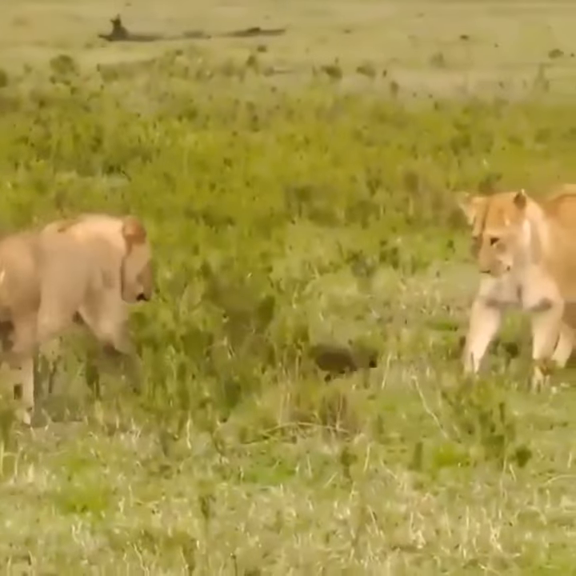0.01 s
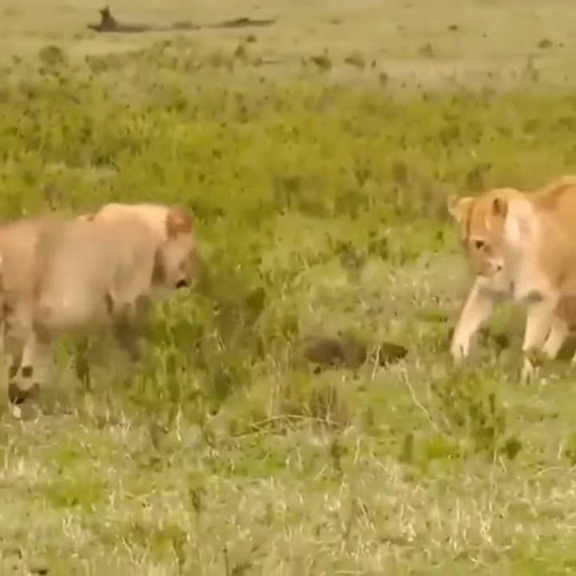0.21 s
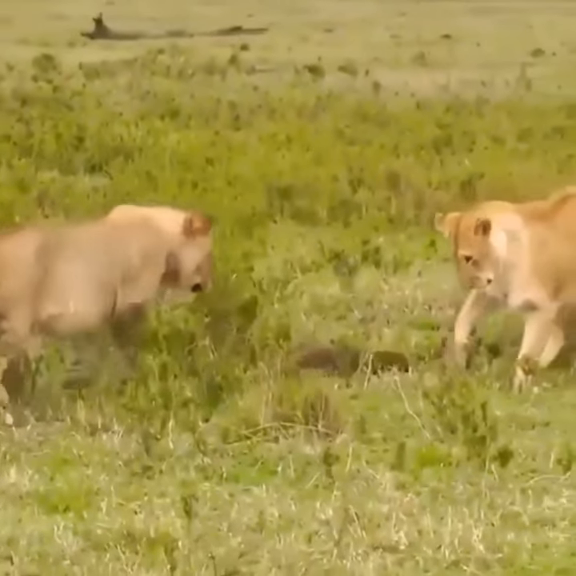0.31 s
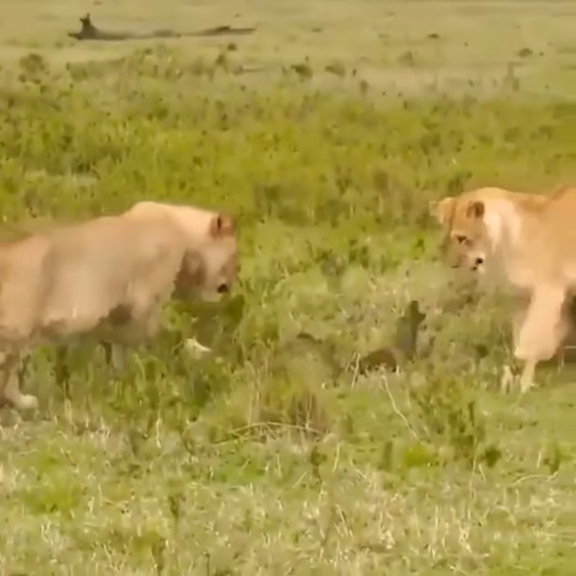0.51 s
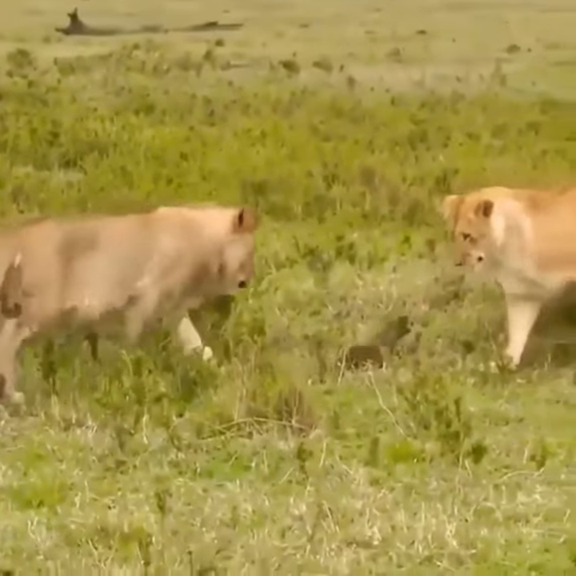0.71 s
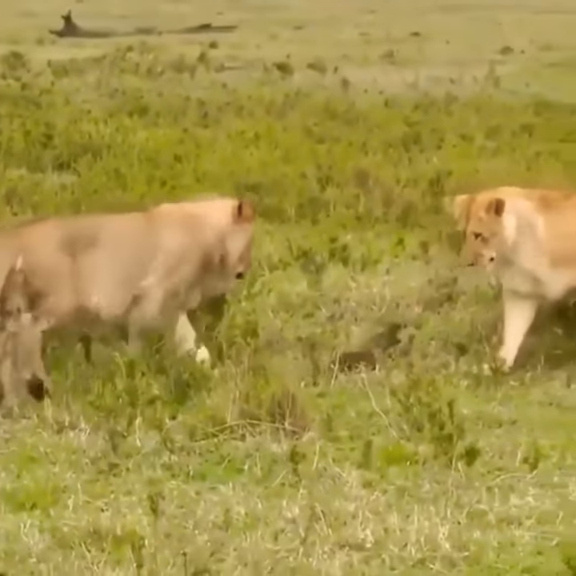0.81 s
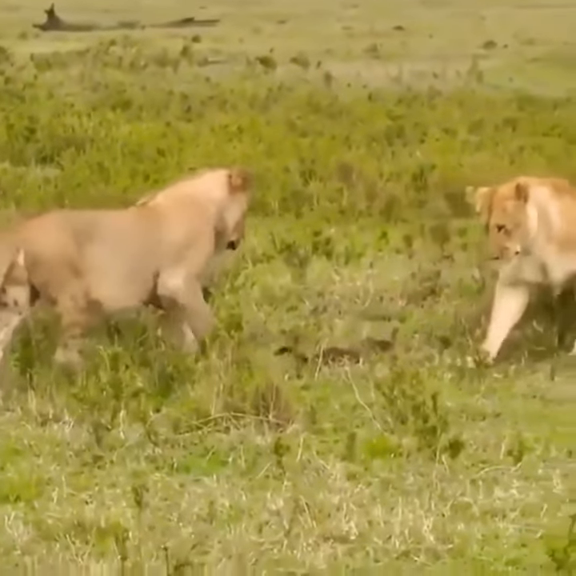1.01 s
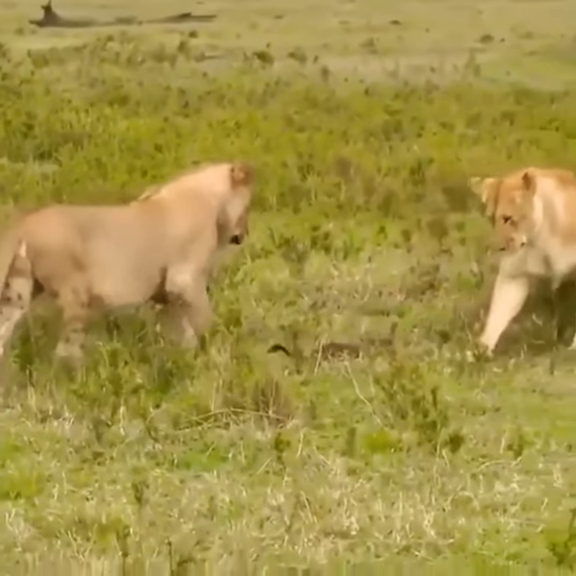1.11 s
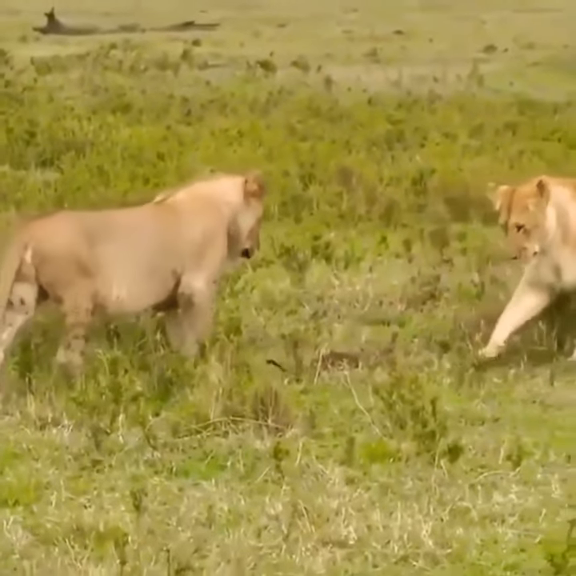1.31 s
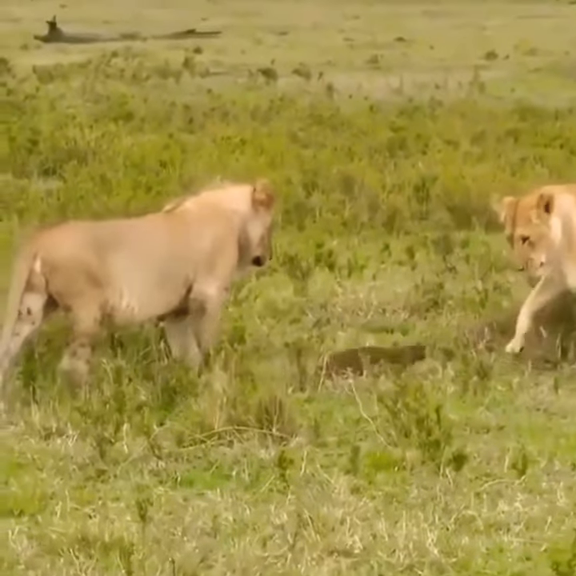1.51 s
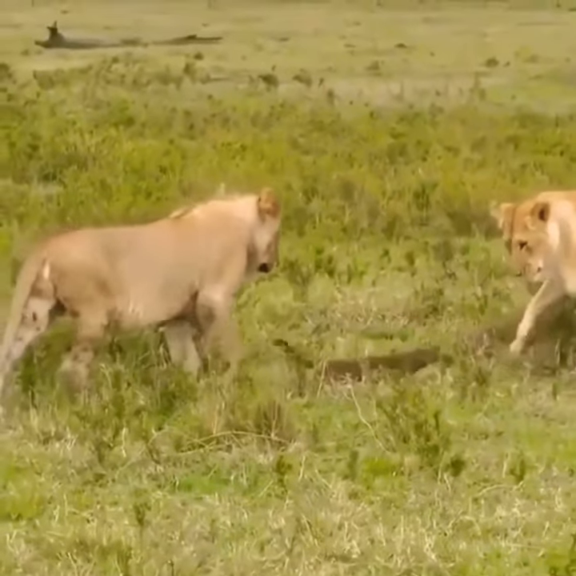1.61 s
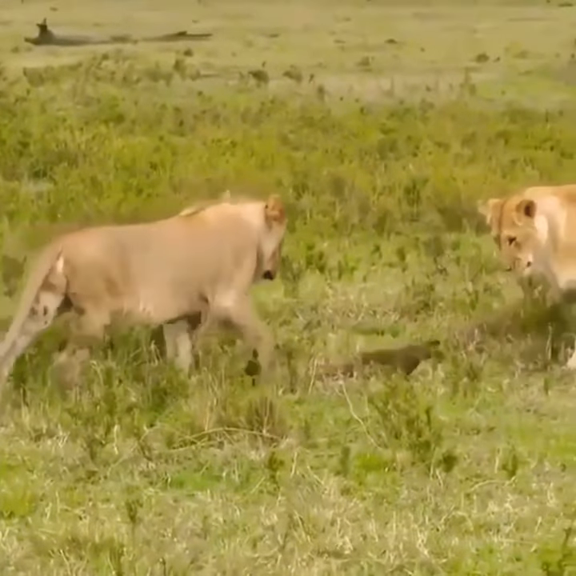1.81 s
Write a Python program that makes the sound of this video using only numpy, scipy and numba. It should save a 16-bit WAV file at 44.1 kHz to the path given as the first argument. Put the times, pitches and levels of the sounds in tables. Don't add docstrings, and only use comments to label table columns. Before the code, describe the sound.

A small wild animal's harsh call, a buzzy whine breaking into a quavering rasp, on windy grassland

```python
import sys
import numpy as np
from scipy import signal
from scipy.fft import rfft, irfft
from scipy.io import wavfile
from scipy.ndimage import uniform_filter1d
from numba import njit

SR = 44100
rng = np.random.default_rng(int(sys.argv[2]) if len(sys.argv) > 2 else 0)


def convert_level_to_amplitude(level_db):
    exponent = np.asarray(level_db, float) / 20
    return 10 ** exponent


def store_wav(level_fs):
    pcm = np.round(np.clip(np.atleast_2d(level_fs), -1, 1) * 32767)
    wavfile.write(sys.argv[1], SR, pcm.T.astype(np.int16))


N = 81585
T = np.arange(N) / SR
LR = np.array([[1], [-1]])


def level(x, db):
    return x * convert_level_to_amplitude(db) / np.sqrt(np.mean(x ** 2))


def smooth_rms(x, size):
    return np.sqrt(uniform_filter1d(x ** 2, size=size))


@njit
def state_variable(x, hz, width):
    y, band, low = np.empty(len(x)), 0., 0.
    for i in range(len(x)):
        g, k = np.tan(np.pi * hz[i] / SR), width / hz[i]
        v = (band + g * (x[i] - low)) / (1 + g * (g + k))
        band, low, y[i] = 2 * v - band, low + 2 * g * v, k * v
    return y


def bandpass(x, hz, width):
    return state_variable(x, hz * np.ones(N), 1. * width)


def ring(x, hz, width):
    return bandpass(bandpass(x, hz, width), hz, width)


def walk(rate):
    hold = int(SR / rate)
    steps = np.repeat(rng.standard_normal(N)[:N // hold + 1], hold)
    return 1.2 * uniform_filter1d(uniform_filter1d(steps, hold), hold)[:N]


def colour(shape):
    hz, db = np.array(shape).T
    f = np.maximum(np.fft.rfftfreq(N, 1 / SR), 1)
    gain = convert_level_to_amplitude(np.interp(np.log(f), np.log(hz), db))
    return level(irfft(rfft(rng.standard_normal(N)) * gain, N), 0)


def tail(x, t60):
    t = np.arange(8192) / SR
    h = rng.standard_normal(len(t)) * convert_level_to_amplitude(-60 * t / t60)
    return signal.fftconvolve(x, h / np.sqrt(np.sum(h ** 2)))[:N]


def fade(start, t60, rise):
    u = np.maximum(T - start, 0)
    return np.minimum(u / rise, 1) * convert_level_to_amplitude(-60 * u / t60)


# (frequency [Hz], level [dB per Hz])
HISS = [(50, 1.5), (130, -12), (300, -12), (800, -14), (1300, -21.5), (2500, -14.5), (5000, -27.5),
        (13000, -46.5)]
# (frequency [Hz], side level [dB])
HISS_SIDE = [(30, -13), (110, -14), (360, -10.5), (800, -14), (1400, -21.5), (3300, -37), (4600, -5),
             (9000, -5.5)]


def field():
    mid, side = rfft(colour(HISS)), rfft(colour(HISS))
    octave = np.log2(np.maximum(np.fft.rfftfreq(N, 1 / SR), 1))
    hz, db = np.array(HISS_SIDE).T
    pair = mid + LR * side * convert_level_to_amplitude(np.interp(octave, np.log2(hz), db))
    hiss, swell = 0, walk(0.63)
    for centre in np.arange(4, 14.5, .5):
        band = np.clip(1 - 2 * np.abs(octave - centre), 0, 1)
        hiss = hiss + convert_level_to_amplitude(swell + 0.56 * walk(12.2)) * irfft(pair * band, N)
    hum = level(ring(rng.standard_normal(N), 46, 25), -56)
    return level(hiss, -45) + hum


# (time [s], level [dB])
GUST = [(0, -67), (.1, -59), (.25, -42), (.4, -40.5), (.48, -37.5), (.6, -44), (.8, -43.5), (.95, -53),
        (1.2, -78), (1.5, -50.5), (1.65, -48.5)]
# (frequency [Hz], level [dB per Hz])
GUST_COLOUR = [(25, -23), (60, 4), (150, -1.5), (300, -5), (800, -12.5), (1500, -32.5)]
# (time [s], level [dB], frequency [Hz], length [s], pan [dB])
THUMPS = [(0.076, -39.5, 78, 0.16, 3), (0.115, -42, 86, 0.19, -1), (0.158, -32, 76.5, 0.016, 4),
          (0.198, -28, 89, 0.034, 2.5), (0.199, -51, 182, 0.085, 36), (0.239, -30, 78.4, 0.026, -2),
          (.265, -33.5, 174, 0.019, 0), (0.307, -33, 88.5, 0.19, -6), (0.383, -32.5, 56.4, 0.043, -8),
          (0.36, -41.5, 402, 0.075, -4), (0.426, -32, 102, 0.02, 6), (0.478, -26, 231, 0.024, 4),
          (0.492, -40.5, 54, 0.1, 17), (0.565, -40, 275, 0.076, -2), (0.582, -45.5, 55, 0.083, 17)]


def wind():
    s, db = np.array(GUST).T
    ports = [colour(GUST_COLOUR) * convert_level_to_amplitude(np.interp(T, s, db) + 1.6 * walk(30.14)) for _ in range(2)]
    out = np.array(ports)
    turns = rng.uniform(0, 2 * np.pi, len(THUMPS))
    for (s, db, hz, length, pan_db), turn in zip(THUMPS, turns):
        bell = np.exp(-.5 * ((T - s) / (0.18 * length)) ** 2)
        port_lag = np.clip(hz / 220, .3, 1) * 0.3 * LR
        phase = 2 * np.pi * hz * (T - s) + turn + port_lag + 1.9 * walk(38.64)
        out += 1.07 * convert_level_to_amplitude(db + LR * pan_db / 2) * bell * np.sin(phase)
    return out


# (time [s], level [dB], decay t60 [s])
TICKS = [
    (0.998, -51.5, 0.073),
    (1.0246, -71, .08),
    (1.236, -48, 0.11),
    (1.383, -53, 0.078),
    (1.771, -51, .1),
    (1.832, -48, .1),
]
# (time [s], level [dB])
RUSTLE = [
    (1.63, -68),
    (1.68, -52),
    (1.76, -46),
    (1.85, -54.5),
]
# (frequency [Hz], width [Hz], level [dB])
STEMS = [(2420, 130, -3), (2740, 160, -5), (3200, 220, -6), (4470, 180, -9), (4990, 130, -14),
         (6800, 250, -18)]
# (time [s], level [dB], frequency [Hz], decay t60 [s])
PINGS = [
    (1.235, -48.5, 4570, 0.077),
    (1.2355, -50, 3500, .1),
    (1.2364, -46.5, 730, 0.14),
    (1.745, -55, 4900, .1),
]


def grass():
    tick_shape = [(300, -35), (3000, 8.5), (8000, 4.5), (13000, -1.5)]  # (Hz, dB)
    blade_shape = [(1200, -13.5), (2200, 0.5), (3300, -4.0), (5500, -16.5), (12000, -25.0)]
    ticks = sum(convert_level_to_amplitude(db) * fade(s, t60, rise=0.0016) for s, db, t60 in TICKS)
    s, db = np.array(RUSTLE).T
    rustle = convert_level_to_amplitude(np.interp(T, s, db, left=-120) + 2 * walk(27))
    mid, side = (ticks * colour(tick_shape) + rustle * colour(blade_shape) for _ in range(2))
    for hz, width, db in STEMS:
        stem = ring(rng.standard_normal(N), hz * (1 + 0.018 * walk(24)), width)
        mid = mid + rustle * convert_level_to_amplitude(db + 4 * walk(25.1)) * level(stem, 0)
    for s, db, hz, t60 in PINGS:
        mid = mid + fade(s, t60, rise=0.002) * level(ring(rng.standard_normal(N), hz, 180), db)
    return mid + .5 * LR * side


# (frequency [Hz], level [dB per Hz])
WHIR = [(180, -62), (300, -88), (591, -6.5), (650, -43), (737, -13), (1300, -13), (2330, -8), (5910, -12),
        (13000, -18.5)]
# (time [s], level [dB], ring centre [Hz], decay t60 [s])
CLICKS = [(1.483, -24, 5500, .03), (1.4921, -11.5, 4700, 0.045), (1.503, -15, 5700, .05),
          (1.513, -20, 5000, 0.072), (1.5342, -29, 2280, 0.027), (1.5459, -21, 2400, 0.08),
          (1.5764, -15.5, 2750, 0.088), (1.5807, -28, 5470, 0.08), (1.589, -15, 3500, 0.026),
          (1.605, -16.5, 3400, 0.031), (1.607, -38, 4340, .03)]
# (frequency [Hz], width [Hz], level [dB])
HOUSING = [(660, 160, 0), (1780, 140, -6), (2320, 150, -6.5), (3440, 170, -5.5), (4270, 140, -8),
           (4900, 200, -14), (5570, 570, -8)]
# (frequency [Hz], width [Hz], start [s], level [dB])
SPREAD = [
    (2300, 2000, 1.488, -7),
    (7600, 2600, 1.505, -9),
    (5400, 1800, 1.528, 3),
    (11000, 3500, 1.53, -8),
]


def mechanism():
    start, stop = 1.4825, 1.6115
    gate = np.clip((T - start) / .003, 0, 1) * convert_level_to_amplitude(-60 * np.maximum(T - stop, 0) / .016)
    out = colour(WHIR) * convert_level_to_amplitude(-26.5 + 1.4 * walk(250))
    coasting = np.exp(-((T - 1.56) / .04) ** 2)
    out = out - .65 * coasting * bandpass(out, 9500, 6300)
    for s, db, hz, t60 in CLICKS:
        body = colour(WHIR)
        click = level(bandpass(body, hz, 0.96 * hz), -3) + 0.085 * body
        out = out + convert_level_to_amplitude(db) * fade(s, t60, rise=0.00046) * click
    housing = sum(convert_level_to_amplitude(db + 2.2 * walk(40)) * bandpass(out, hz, width) for hz, width, db in HOUSING)
    out = (out + 1.5 * housing) * gate * 0.72
    thin_start = np.exp(-((T - start) / 0.045) ** 2)
    out = out - 0.58 * thin_start * bandpass(out, 900, 1650)
    out = out + convert_level_to_amplitude(-15.5) * tail(out, 0.09)
    grit = np.sqrt(uniform_filter1d(out ** 2, size=900) + 1e-12) * rng.standard_normal(N)
    wide = 0
    for hz, width, s, db in SPREAD:
        wide = wide + convert_level_to_amplitude(db) * np.clip((T - s) / .025, 0, 1) * ring(grit, hz, width)
    return out + LR * convert_level_to_amplitude(5) * wide


# (time [s], peak level [dB])
CHATTER = [(0.442, -7), (0.461, -3.5), (0.4888, -6.5), (0.5124, -12.5), (0.5314, -16.5), (0.552, -9.5),
           (0.5745, -8), (0.601, -16), (0.6286, -13), (0.6629, -7.5), (0.6847, -10.5), (0.716, -14),
           (0.7325, -9), (0.7534, -10.5), (0.7784, -12.5), (0.8036, -12.5), (0.8265, -12.5),
           (0.8455, -14.5), (0.8754, -21), (0.8944, -27)]


def chatter():
    gap_s, dip_db, sag_db_s = .003, 9, 120
    s, db = np.array(CHATTER).T
    call_s, call_db = np.array(CALL).T[:2]
    db = db - np.interp(s, call_s, call_db)
    k = np.clip(np.searchsorted(s, T) - 1, 0, None)
    gaps = sum(np.exp(-((T - at + gap_s) / gap_s) ** 2) for at in s[1:])
    swell = (db - db.mean())[k] - sag_db_s * np.clip(T - s[k], 0, .04)
    return (uniform_filter1d(3.5 + swell, size=130) - dip_db * gaps) * (T > s[0])


# (frequency [Hz], width [Hz], level [dB],
# relative shift [per unit of opening], growth [dB per unit of opening])
WHINE = [(1330, 300, -13, .05, 0), (1830, 200, -2, -.02, -6), (2420, 260, -1, .1, 8),
         (2900, 300, -16, .1, -8), (3700, 300, -2.5, .12, 0), (4150, 220, -10, .1, 0),
         (4480, 200, -16, .1, 0), (4950, 250, -19, .05, 8), (5400, 900, -17, 0, -3),
         (6150, 500, -20, .03, 0), (8500, 5000, -18, 0, 0)]


def whine_voice(hz, share, mouth):
    block = 75
    phase = np.cumsum(hz * (1 + .0035 * walk(90))) / SR
    turns = rng.uniform(0, 1, 75)
    flutter = 3 * uniform_filter1d(rng.standard_normal((N // block + 1, 75)), size=9, axis=0)
    buzz = 0
    for k in range(5, 75):
        shimmer = convert_level_to_amplitude(1.5 * flutter[:, k].repeat(block)[:N])
        rolloff = (1 + (k / 42) ** 6) * (1 + (1150 / k / hz) ** 12)
        buzz = buzz + np.cos(2 * np.pi * (k * phase + turns[k])) * shimmer / rolloff
    breath = (1 + .6 * np.cos(2 * np.pi * phase)) * rng.standard_normal(N)
    drive = level(buzz, 0) + level(breath, -11) * convert_level_to_amplitude(20 * share)
    drive = drive / smooth_rms(drive, 600)
    out = 0
    for k, (f, width, db, shift, grow) in enumerate(WHINE):
        formant = ring(drive, f * (1 + shift * mouth), width) / np.sqrt(width)
        out = out + (-1) ** k * convert_level_to_amplitude(db + grow * mouth) * formant
    return out


# (frequency [Hz], width [Hz], starting level [dB],
# level slope [dB per s], relative shift [per unit of opening])
RASP = [(1434, 630, -21, 15.5, 0), (1968, 202, -0.5, -2, 0.12), (2360, 530, -10, 1, 0.061),
        (2826, 600, 0, -20.5, 0.035), (3232, 850, 1, -31.5, 0.223), (3720, 1700, -13.5, -45, 0),
        (5000, 1260, -17, -20.5, 0.092), (8600, 9700, -33.5, -2.5, 0.017)]


def rasp_voice(hz, mouth):
    ragged = np.cumsum(hz * np.exp(.15 * walk(170))) / SR
    pulses = np.diff(np.floor(ragged), prepend=0) * convert_level_to_amplitude(0.48 * rng.standard_normal(N))
    puff = np.exp(-(ragged % 1) / 3.4) * rng.standard_normal(N)
    drive = level(pulses, 0) + level(puff, 3.5)
    out = 0
    for k, (f, width, db, slope, shift) in enumerate(RASP):
        centre = f * (1 + shift * mouth + 0.0069 * walk(30))
        out = out + (-1) ** k * convert_level_to_amplitude(db + slope * (T - 0.47)) * level(ring(drive, centre, width), 0)
    out = out / smooth_rms(out, 900) ** 0.74 * convert_level_to_amplitude(0.4 * walk(69.96))
    ridge = ring(out, RASP[1][0] * (1 + RASP[1][4] * mouth), 300)
    steady = ridge / smooth_rms(ridge, 260) ** 0.6
    power_ratio = uniform_filter1d(ridge ** 2, size=4000) / uniform_filter1d(steady ** 2, size=4000)
    return out - ridge + convert_level_to_amplitude(chatter()) * steady * np.sqrt(power_ratio)


# (time [s], level [dB], pulse rate [Hz], rasp share [0-1], mouth opening [relative])
CALL = [
    (.222, -30, 152.7, 0.86, -0.76),
    (.255, -24, 162.5, 0.3, -0.31),
    (.3, -24.5, 173.8, 0.6, 0.2),
    (0.334, -25, 179.3, 0.23, 0.37),
    (.395, -24, 176.8, 0.36, -0.5),
    (.45, -15, 192.3, 0.78, 0.3),
    (0.521, -15, 190.3, 0.97, 0.039),
    (0.779, -18, 187.9, 0.92, -0.25),
    (0.896, -20, 181.6, 0.99, -0.71),
]
# (time [s], length [s], frequency [Hz], level [dB])
SQUEAKS = [
    (.455, 0.022, 1340, -29.5),
    (0.842, 0.051, 2720, -32),
    (0.267, 0.018, 1880, -27.5),
]


def mongoose():
    s, db, hz, share, mouth = np.array(CALL).T
    share = np.clip(share, 0, 1)
    hz, share, mouth = (np.interp(T, s, column) for column in (hz, share, mouth))
    whine = whine_voice(hz, share, mouth)
    rasp = rasp_voice(hz, mouth)
    share = share * np.clip((T - .39) / .04 + 1, 0, 1)
    on = (T > s[0]) & (T < s[-1])
    voice = np.sqrt(1 - share) * level(whine, 0) + np.sqrt(share) * rasp / np.std(rasp[on])
    attack_s, release_s = .010, .022
    edge = np.minimum((T - s[0]) / attack_s, (s[-1] - T) / release_s)
    call = voice * np.clip(edge + 1, 0, 1) ** 2 * convert_level_to_amplitude(np.interp(T, s, db))
    for at, length, f, squeak_db in SQUEAKS:
        squeak = level(ring(rasp_drive(hz), f, 40), squeak_db)
        call = call + np.exp(-((T - at) / length) ** 2) * squeak
    mid = call + convert_level_to_amplitude(-14) * tail(call, .12)
    wide = call + 4.1 * ring(call, 8000, 6900)
    return mid + LR * convert_level_to_amplitude(-18) * tail(wide, .12)


def rasp_drive(hz):
    ragged = np.cumsum(hz * np.exp(.15 * walk(170))) / SR
    pulses = np.diff(np.floor(ragged), prepend=0) * convert_level_to_amplitude(0.48 * rng.standard_normal(N))
    puff = np.exp(-(ragged % 1) / 3.4) * rng.standard_normal(N)
    return level(pulses, 0) + level(puff, 3.5)


def scene():
    return field() + wind() + grass() + mechanism() + mongoose()


# (frequency [Hz], mid [dB], side [dB])
GATE_DEPTH = [(900, 80, 60), (1300, 80, 20), (4000, 70, 20), (5500, 44, 38), (7000, 39, 43), (13000, 49, 50)]


def gate_bands(x):
    bins, scatter_db = 14, 6
    f, _, z = signal.stft(np.array([x[0] + x[1], x[0] - x[1]]) / 2, SR, "cosine", 2048)
    band = np.arange(len(f)) // bins
    energy = np.add.reduceat(np.abs(z) ** 2, np.arange(0, len(f), bins), axis=1)
    power = 10 * np.log10(energy + 1e-20)
    hz, *margins = np.array(GATE_DEPTH).T
    under = np.array([np.interp(f[::bins] + 200, hz, m) for m in margins])[:, :, None]
    luck = np.sqrt(2) * scatter_db * uniform_filter1d(rng.standard_normal(power.shape), size=2)
    keep = power > power[0, 2:].max(axis=0) - under + luck
    mid, side = signal.istft(z * keep[:, band], SR, "cosine", 2048)[1][:, :N]
    return mid + LR * side


def band_limit(x):
    return signal.sosfilt(signal.butter(12, 13740, fs=SR, output="sos"), x)


def record(dry):
    low_pass = signal.ellip(10, .2, 60, 13100, fs=SR, output="sos")
    mix = gate_bands(signal.sosfilt(low_pass, dry))
    return band_limit(mix)


dry = scene()
out = record(dry)
store_wav(out)
```